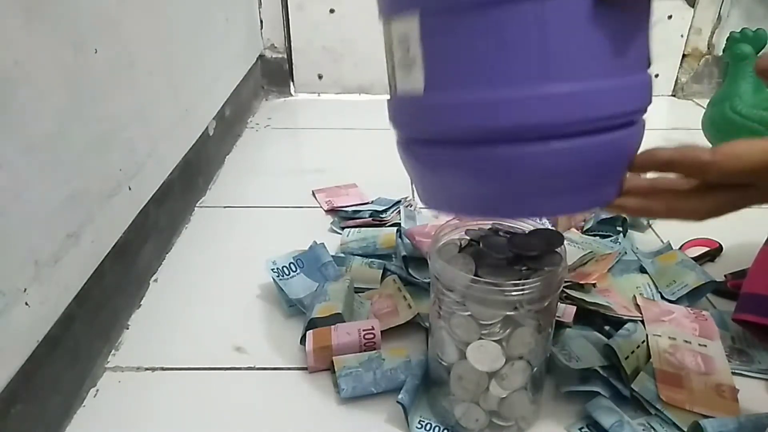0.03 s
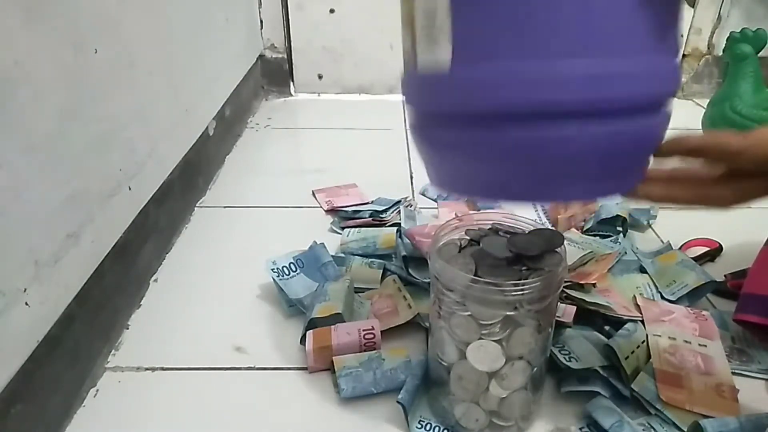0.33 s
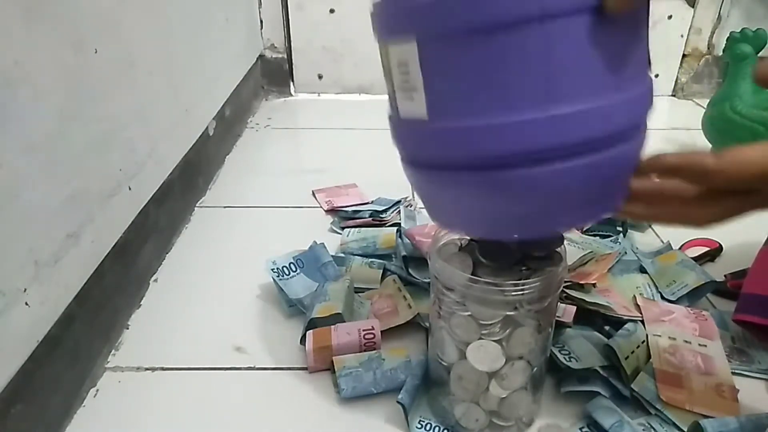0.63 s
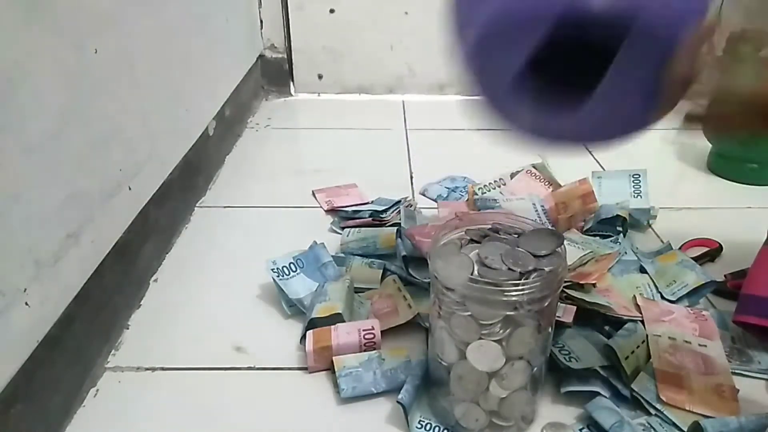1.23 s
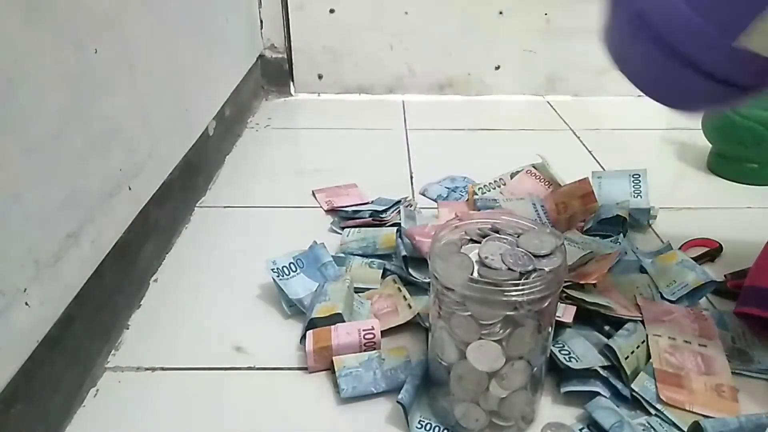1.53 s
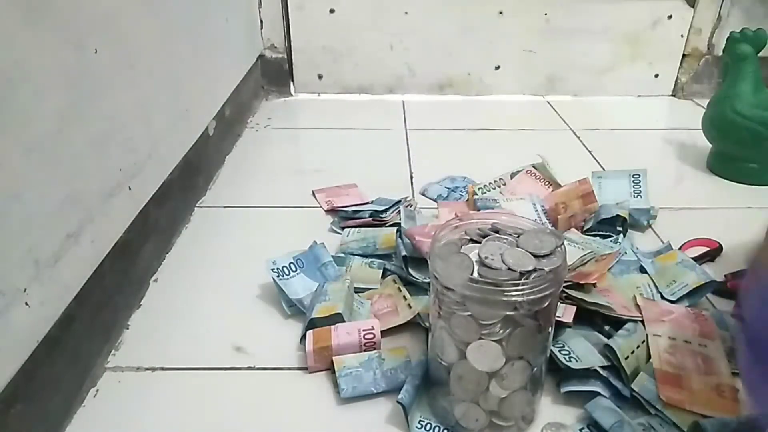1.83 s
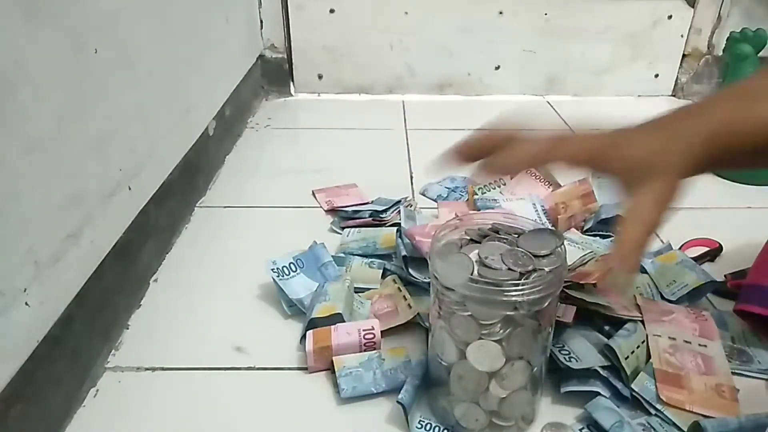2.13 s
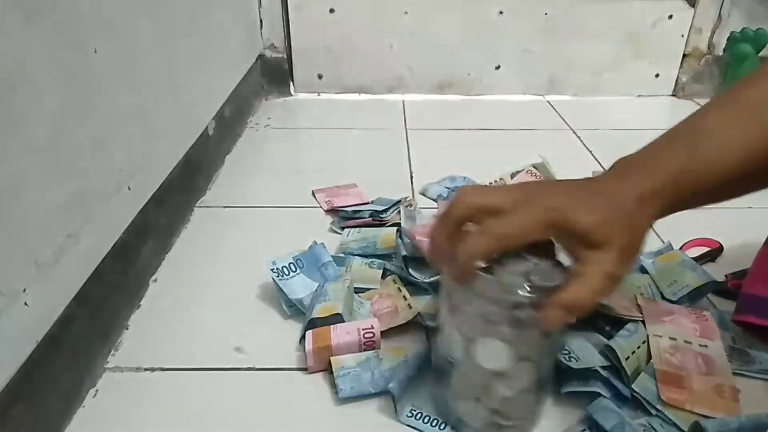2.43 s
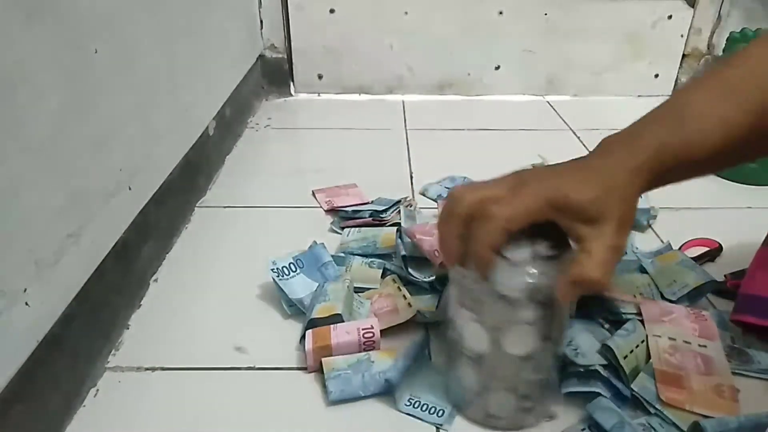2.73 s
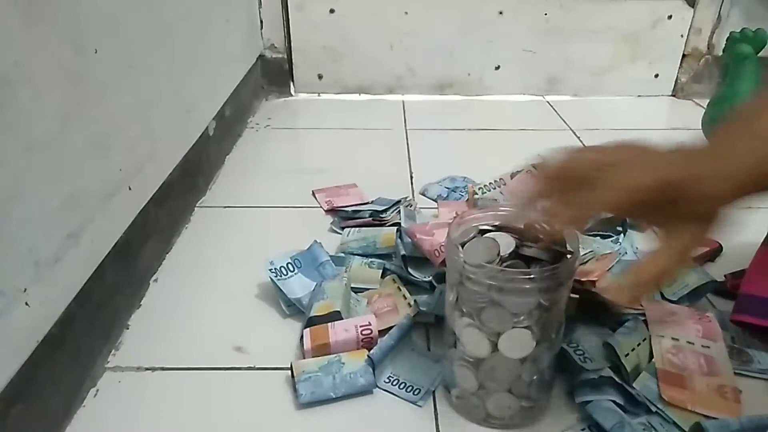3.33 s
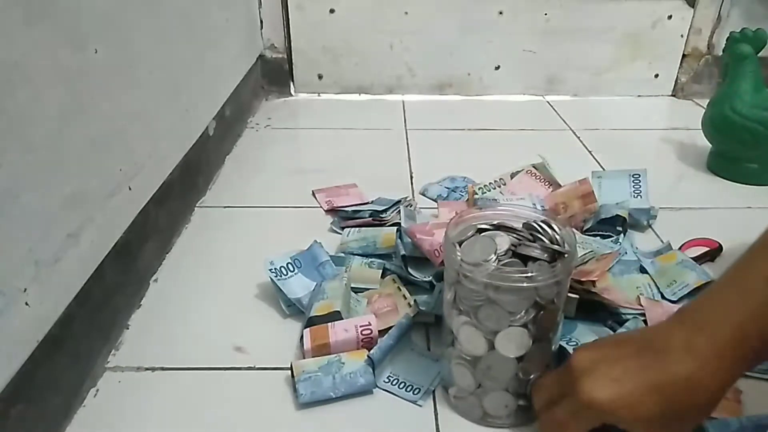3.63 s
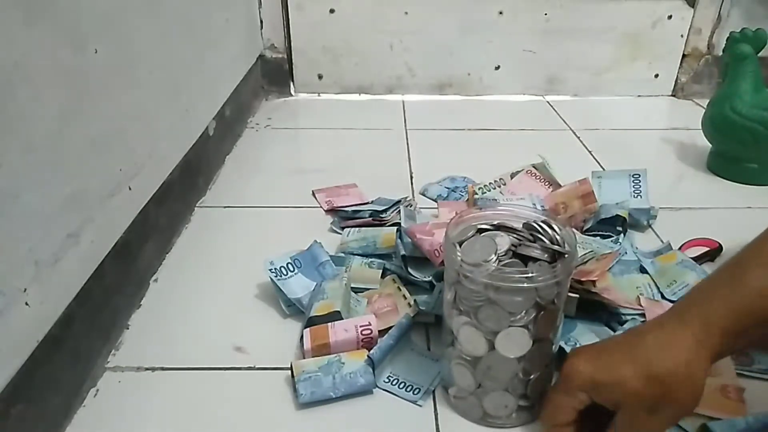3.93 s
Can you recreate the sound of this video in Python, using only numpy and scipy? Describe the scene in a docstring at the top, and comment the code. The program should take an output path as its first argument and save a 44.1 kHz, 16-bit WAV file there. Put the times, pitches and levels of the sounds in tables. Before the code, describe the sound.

Coins slide and knock inside a hollow plastic money bank and drop clinking onto a pile in a jar. The bank rolls aside, then the full jar is shaken and set down, close up in a small tiled room.

```python
"""Emptying a money bank into a coin jar.

In a small tiled room the last coins slide and knock in a hollow plastic bank, whose air hoots as it
swings. They drop clinking on the pile in a jar and ring very high as they spin. The bank rolls aside;
the full jar is shaken for a second and set down, a few coins settle and banknotes crinkle faintly.
The close microphone overloads a little."""
import sys
import numpy as np
from scipy import signal
from scipy.fft import rfft, irfft
from scipy.io import wavfile
from scipy.ndimage import uniform_filter1d

SR = 44100
rng = np.random.default_rng(int(sys.argv[2]) if len(sys.argv) > 2 else 0)


def int16_out(signal):
    """Quantize to a 16-bit WAV file."""
    q = np.round(np.clip(np.atleast_2d(signal).T, -1, 1) * 32767)
    wavfile.write(sys.argv[1], SR, q.astype(np.int16))


N = 176400
LARGE, MEDIUM, SMALL = 12915, 13100, 14640  # lower mode by coin size, f/Hz


def from_db(db):
    """Decibels to gain."""
    return 10 ** (np.asarray(db) / 20)


def rms_one(x):
    """Scale to unit power."""
    return x / np.sqrt(np.mean(x ** 2) + 1e-20)


def even(x, window_s):
    """Hold the running power at 1."""
    return x / np.sqrt(np.abs(uniform_filter1d(x ** 2, int(window_s * SR) + 1)) + 1e-9)


def level(curve):
    """Gain from a curve of (t/s, level/dB), silent outside it."""
    times_s, db = np.vstack(curve).T
    return from_db(np.interp(np.arange(N) / SR, times_s, db, left=-120, right=-120))


def colour(x, spectrum):
    """Minimum-phase filter from (f/Hz, level/dB); keeps the power of white noise."""
    hz, db = np.transpose(spectrum)
    bins_hz = np.arange(N + 1) * SR / (2 * N)
    gain = rms_one(from_db(np.interp(np.log(bins_hz + 1), np.log(hz), db)))
    cepstrum = irfft(np.log(gain))[:N]
    cepstrum[1:] *= 2
    return irfft(np.exp(rfft(cepstrum, 2 * N)) * rfft(x, 2 * N))[:N]


def ring(x, hz, t60_s):
    """One damped mode: a unit click starts a sine of height 1."""
    r, w = from_db(-60 / (t60_s * SR)), 2 * np.pi * hz / SR
    return signal.lfilter([0, np.sin(w)], [1, -2 * r * np.cos(w), r * r], x + 1e-18)


def ring_modes(x, modes):
    """Modes (f/Hz, level/dB, t60/s) driven by x, at unit total power."""
    return rms_one(sum(from_db(db) * rms_one(ring(x, hz, t60_s)) for hz, db, t60_s in modes))


def ping(at_s, hz, t60_s):
    """One mode, struck once."""
    return ring(signal.unit_impulse(N, int(at_s * SR)), hz, t60_s)


def resonance(hz, width_hz):
    """Noise-driven resonance of steady power; its centre may move."""
    r = np.exp(-np.pi * width_hz / SR)
    a, b = signal.lfilter([1 - r], [1, -2 * r, r * r], rng.standard_normal((2, N)))
    phase = 2 * np.pi * np.cumsum(hz * np.ones(N)) / SR
    return even(a * np.cos(phase) + b * np.sin(phase), window_s=0.036)


def burst(t60_s):
    """Dying noise of unit energy: a crowd of short modes."""
    t = np.arange(SR // 2) / SR
    x = rng.standard_normal(len(t)) * from_db(-60 * t / t60_s)
    return x / np.linalg.norm(x)


def contacts(per_s, spread_db, t60_s, timbres=8):
    """Random contacts of unequal size, each ringing briefly; steady power."""
    sizes = from_db(spread_db * np.minimum(rng.exponential(1, N), 4))
    hits = sizes * (rng.random(N) < per_s / SR)
    timbre = rng.integers(0, timbres, N)
    stream = sum(signal.fftconvolve(hits * (timbre == k), burst(t60_s))[:N] for k in range(timbres))
    return even(stream, window_s=0.0346)


def blows(rows, t60_s, bounce_s, bounce_db):
    """A short crack and a weaker bounce per row (t/s, level/dB)."""
    out = np.zeros(N + SR)
    for at_s, db, *_ in rows:
        for delay_s, loss_db in ((0, 0), (bounce_s * rng.uniform(.5, 1.5), bounce_db)):
            crack = burst(t60_s) * np.sqrt(.003 * SR)  # energy of 3 ms at unit power
            i = int((at_s + delay_s) * SR)
            out[i:i + len(crack)] += from_db(db + loss_db) * crack
    return out[:N]


def room(x, wet_db):
    """Add the diffuse tail of the tiled room, 5 ms late."""
    tail = np.r_[np.zeros(SR // 200), burst(t60_s=0.24)]
    return x + from_db(wet_db) * signal.fftconvolve(x, tail)[:N]


def room_hum():
    """Steady low noise of the room."""
    spectrum = [(25, 1), (45, -7), (75, -1), (130, -4), (200, -15), (350, -22), (1000, -20.5),
                (3000, -31.5), (8000, -37), (15000, -31)]  # f/Hz, level/dB
    return from_db(-45) * colour(rng.standard_normal(N), spectrum)


def thump(start_s=0.16, end_s=0.396, fade_s=0.012, swing_hz=2.7):
    """The overloaded microphone swings slowly once after the first hard hit: a faint low thump."""
    t = np.arange(N) / SR
    gate = np.clip((t - start_s) / fade_s, 0, 1) * np.clip((end_s - t) / fade_s, 0, 1)
    return from_db(-13) * gate * np.sin(2 * np.pi * swing_hz * (t - .228))


def banknotes():
    """Paper crinkles faintly under the hand and the jar."""
    brushing = [(3.57, -64), (3.62, -29), (3.66, -49), (3.69, -34.5), (3.76, -47), (3.80, -42),
                (3.85, -53.5), (3.92, -53), (3.98, -42), (4.0, -47)]  # t/s, level/dB
    paper_spectrum = [(300, -4), (1500, -0.5), (3300, 1.5), (5500, -6), (8200, 7), (11000, -6),
                      (15000, -0.5)]  # f/Hz, level/dB
    crinkle = contacts(per_s=500, spread_db=2, t60_s=0.02) * level(brushing)
    return room(colour(crinkle, paper_spectrum), wet_db=-10)


def rolling_bank():
    """The bank rolls on the tiles: a hollow scrape with gliding resonances."""
    rolling = [(2.021, -31), (2.045, -26.5), (2.12, -25.5), (2.32, -31.5), (2.371, -43)]  # t/s, level/dB
    # shell modes: start f/Hz, end f/Hz, width/Hz, start level/dB, end level/dB
    shell_modes = [(243, 160, 30, -8.5, -9), (430, 480, 110, 0, -9), (582, 700, 220, -10, -21),
                   (1180, 1380, 240, -4.5, 5), (1666, 1600, 300, -13.5, 1.5)]
    t = np.arange(N) / SR
    span_s = (rolling[0][0], rolling[-1][0])
    shell = np.zeros(N)
    for start_hz, end_hz, width_hz, start_db, end_db in shell_modes:
        gain = from_db(np.interp(t, span_s, (start_db, end_db)))
        shell += gain * resonance(np.interp(t, span_s, (start_hz, end_hz)), width_hz)
    return level(rolling) * shell


def bank_air():
    """The air in the bank hoots with each swing; the pitch shifts as the bank is turned."""
    # swells: peak t/s, length/s, f/Hz, level/dB
    hoots = [(.01, 0.11, 265, -36), (0.285, 0.071, 265, -36), (0.482, 0.13, 255, -40),
             (0.696, 0.061, 260.7, -21), (0.877, 0.084, 260.5, -33.5), (0.971, .06, 260.7, -30.5),
             (1.03, 0.14, 265, -37), (1.252, 0.19, 220.9, -30.5), (1.439, 0.11, 193, -27),
             (1.814, 0.21, 260, -20.5), (1.968, 0.065, 243, -24)]
    t = np.arange(N) / SR
    peaks_s, _, pitches_hz, _ = np.transpose(hoots)
    swell = sum(from_db(db) * np.cos(np.pi * np.clip((t - peak_s) / length_s, -.5, .5)) ** 2
                for peak_s, length_s, _, db in hoots)
    return swell * resonance(np.interp(t, peaks_s, pitches_hz), width_hz=44)


def coins_in_bank():
    """Coins slide and knock in the hollow plastic bank, and sing as it is turned over."""
    sliding = [
        [(0.0, -26), (.14, -49), (.225, -67), (.266, -31), (.37, -20), (.412, -47), (.49, -32.5), (.6, -59.5)],
        [(.66, -26.5), (.698, -19.5), (.78, -34), (.82, -52), (.87, -37.5), (.93, -42.5), (1.028, -21.5),
         (1.112, -44), (1.264, -18.5), (1.33, -34)],
        [(1.438, -14.5), (1.49, -24), (1.632, -44.5), (1.66, -23), (1.7, -11), (1.742, -23.5), (1.76, -12.5),
         (1.812, -19.5), (1.825, -30), (1.898, -14.5), (1.934, -31.5)],
        [(1.97, -22), (2.012, -32), (2.04, -22), (2.2, -23.5), (2.325, -19.5), (2.375, -36), (2.42, -48)],
    ]  # runs of (t/s, level/dB)
    # hits on the wall: t/s, level/dB, wall ring f/Hz, ring level/dB, ring t60/s
    wall_hits = [(0.167, -13.5, 1313, -16, 0.048), (.565, -26, 1488, -16, 0.027),
                 (1.021, -25, 1914, -17.5, 0.056), (1.36, -15, 1330, -30, .06),
                 (1.399, -15, 623, -10, 0.037), (1.428, -7, 632, -7.5, 0.082),
                 (1.502, -8.5, 571, -15.5, 0.21), (1.643, -7.5, 885, -16, 0.031),
                 (1.675, -19, 548, -17, 0.073), (1.751, -6, 554, -28, 0.093),
                 (1.787, -12, 415.5, -8.5, 0.13), (1.803, -4.5, 250, 0, 0.084),
                 (1.944, -6, 1266, -2, 0.034), (1.969, -16.5, 561, -4, 0.035),
                 (1.996, -35, 3390, -15.5, 0.043), (2.165, -19.5, 1270, -19, .06),
                 (2.18, -13, 1097, -14.5, 0.073), (2.265, -16.5, 1294, -20, 0.15),
                 (3.84, -57, 635, -36, 0.055)]
    bank_spectrum = [(70, -35.5), (130, -1.5), (200, -2.5), (310, -6.5), (400, -1.5), (620, 2), (800, -7.5),
                     (1300, -1.5), (2200, -5), (3300, -14.5), (5000, -24.5), (15000, -28.5)]  # f/Hz, level/dB
    # modes of the bank and of the loose coins: f/Hz, level/dB, t60/s
    bank_modes = [(198, -24, 0.21), (254, -2.5, 0.24), (406, -5, 0.1), (546, -9.5, 0.17), (935, -8, 0.09),
                  (1111, 4.5, 0.13), (1280, -7, 0.29), (1414, 4, 0.05), (1970, -3.5, 0.14)]
    coin_modes = [(10600, 3.5, 0.056), (10910, 7.5, 0.094), (13000, -6.5, 0.052), (13520, 16, 0.1),
                  (14000, -10, 0.049)]
    # coins singing during the turn: t/s, level/dB
    turning = [(1.2, -20), (1.38, -13), (1.5, -1.5), (1.8, -7.5), (2.12, 7), (2.3, -3), (2.42, -48)]
    slide = contacts(per_s=900, spread_db=1.5, t60_s=0.016) * level(sliding)
    knocks = blows(wall_hits, t60_s=0.04, bounce_s=.007, bounce_db=-3)
    knocks = signal.sosfilt(signal.butter(2, 300, "high", fs=SR, output="sos"), knocks)
    drive = from_db(-2.5) * slide + from_db(-1.5) * knocks
    hollow = from_db(-10) * drive.std() * ring_modes(drive, bank_modes)
    wall = sum(from_db(db) * ping(at_s, hz, t60_s) for at_s, _, hz, db, t60_s in wall_hits)
    tumble = slide * level(turning)
    singing = from_db(-2.5) * tumble.std() * ring_modes(tumble, coin_modes)
    return room(colour(drive, bank_spectrum) + hollow + wall, wet_db=-15.5) + singing


def shaken_jar():
    """Coins clash with each other and the thin jar wall, which knocks hollowly at the turns."""
    shaking = [(2.38, -28), (2.41, -15), (2.456, -27), (2.48, -16), (2.58, -16.5), (2.615, -25.5),
               (2.64, -20.5), (2.74, -21.5), (2.774, -18.5), (2.815, -32), (2.86, -22.5), (2.9, -23),
               (2.93, -17), (3.01, -23), (3.065, -18.5), (3.16, -32.5), (3.215, -20), (3.35, -28),
               (3.42, -96)]  # t/s, level/dB
    # the load of coins hits the jar: t/s, level/dB
    load_hits = [(2.393, -22), (2.403, -10), (2.417, -14.5), (2.479, -9), (2.505, -8), (2.558, -9.5),
                 (2.577, -14.5), (2.626, -13.5), (2.654, -12.5), (2.689, -18.5), (2.775, -17),
                 (2.847, -23.5), (2.925, -12.5), (2.965, -14), (3.022, -24), (3.046, -14), (3.10, -17.5),
                 (3.207, -18), (3.219, -16), (3.285, -18), (3.309, -25), (3.34, -49), (3.576, -33),
                 (3.622, -22.5)]
    wall_knocks = [(2.415, 657, -17.5), (2.478, 1056, -15.5), (2.575, 680, -22), (2.857, 720, -24)]  # t/s, f/Hz, level/dB
    coin_spectrum = [(1000, -37), (5000, -14), (6800, -8.5), (8300, 1.5), (9200, -3), (10500, -14),
                     (12300, -14), (13000, 3), (13600, 6.5), (14000, -3), (15400, 0)]  # f/Hz, level/dB
    wall_spectrum = [(100, -26), (350, -13.5), (600, -9), (1000, -1.5), (1350, -4), (1900, -1.5),
                     (2400, -0.5), (2900, -3), (3600, -3), (5000, -6), (9000, -8.5)]  # f/Hz, level/dB
    clash = contacts(per_s=650, spread_db=1, t60_s=0.015) * level(shaking)
    jolts = from_db(5) * blows(load_hits, t60_s=0.024, bounce_s=0.0066, bounce_db=-1)
    coins = colour(from_db(4.5) * clash + jolts, coin_spectrum)
    wall = colour(from_db(-6.5) * clash + from_db(-8.5) * jolts, wall_spectrum)
    hollow = sum(from_db(db) * ping(at_s, hz, t60_s=0.041) for at_s, hz, db in wall_knocks)
    return room(coins + wall + hollow, wet_db=-7.5)


def ringing_coins(mode_ratio=1.0325, attack_s=.0008, damped_t60_s=0.13, chatter_hz=70):
    """A free coin rings on a split pair of modes, wavering as it spins, until damped."""
    # rings: t/s, lower mode f/Hz, lower level/dB, upper level/dB, free time/s
    free_rings = [(0, LARGE, -20, -6.5, .003), (.168, LARGE, -12.5, -15, 0.19),
                  (.382, LARGE, -27, -10, 0.12), (.525, LARGE, -25, -4, 0.037),
                  (.58, LARGE, -16, -11, 0.048), (.764, SMALL, -3, -11, 0.0086), (.786, SMALL, -2, -2, .02),
                  (.892, LARGE, -12, -6, 0.019), (.926, LARGE, -25, -9, 0.042),
                  (1.362, LARGE, -22, -16.5, 0.065), (1.69, MEDIUM, -14, -13.5, 0.034),
                  (1.845, MEDIUM, -12, -12, 0.053), (1.994, LARGE, -35, -5.5, 0.0033),
                  (2.11, MEDIUM, -18, -15, .01), (2.195, MEDIUM, -12, -14, .012),
                  (2.782, SMALL, -19, -1, .002), (2.797, SMALL, -13, -2, 0.022),
                  (2.876, SMALL, -22, -3.5, 0.039), (2.97, SMALL, -10, -6.5, 0.019),
                  (3.022, SMALL, -11, -16, 0.06), (3.098, SMALL, -8, -3.5, 0.035),
                  (3.263, SMALL, -7, -5, 0.018), (3.31, SMALL, -5.5, -6, .03)]
    out = np.zeros(N)
    for at_s, lower_hz, lower_db, upper_db, free_s in free_rings:
        i = int(at_s * SR)
        t = np.arange(min(N - i, SR // 2)) / SR
        damping = from_db(-60 * np.maximum(t - free_s, 0) / damped_t60_s)
        envelope = (1 - np.exp(-t / attack_s)) * damping
        for hz, db in ((lower_hz, lower_db), (lower_hz * mode_ratio, upper_db)):
            spin_hz = 25.6 * rng.uniform(0.47, 1.42)
            waver = 1 + 0.33 * np.cos(2 * np.pi * spin_hz * t)
            out[i:i + len(t)] += from_db(db) * envelope * waver * np.sin(2 * np.pi * hz * t)
    lowpass = signal.butter(2, chatter_hz, fs=SR, output="sos")
    chatter_db = 2 * rms_one(signal.sosfilt(lowpass, rng.standard_normal(N)))
    return out * from_db(chatter_db - 3)


def falling_coins():
    """Coins jostle at the bank's opening and strike the pile."""
    jostling = [
        [(0.0, -18), (0.155, -80), (0.175, -31.5), (0.596, -29.5), (0.75, -17.5)],
        [(0.75, -31), (1.03, -28), (1.158, -53), (1.27, -21.5), (1.62, -40.5)],
        [(1.635, -41), (1.65, -22.5), (1.81, -22.5), (1.824, -32.5), (2.28, -23), (2.38, -31.5)],
    ]  # runs of (t/s, level/dB)
    pile_hits = [(.167, -11.5), (.173, -7.5), (.382, -4), (.524, -12), (.541, -11.5), (.551, -10),
                 (.564, -3.5), (.568, -5), (.585, -22), (.759, -15), (.775, -9), (.876, -15), (.893, -21),
                 (.926, -14.5), (.966, -15.5), (1.021, -13.5), (1.218, -19), (1.261, -8), (1.266, -14),
                 (1.337, -11), (1.362, 2), (1.643, -15), (1.69, -8), (1.802, -5.5), (1.97, -15.5),
                 (2.178, -14), (3.647, -22), (3.677, -17), (3.694, -37)]  # t/s, level/dB
    coin_spectrum = [(300, -17), (1500, -15.5), (3500, -14.5), (5500, -17), (7000, -9.5), (8300, 2.5),
                     (9700, -7), (12200, -9), (13300, 9), (14200, -4.5), (15400, 2)]  # f/Hz, level/dB
    jostle = from_db(2.5) * contacts(per_s=280, spread_db=5, t60_s=0.066) * level(jostling)
    clinks = from_db(2) * blows(pile_hits, t60_s=0.014, bounce_s=0.0037, bounce_db=-4.5)
    return room(colour(jostle + clinks, coin_spectrum), wet_db=-7.5)


def scene():
    """All sources over the room's hum, mono."""
    background = room_hum() + thump()
    bank = coins_in_bank() + bank_air() + rolling_bank()
    coins = falling_coins() + ringing_coins() + shaken_jar()
    return (background + bank + coins + banknotes())[None]


def record(dry):
    """Mild overload flattens the loudest peaks; a steep low-pass cuts the top."""
    ceiling, cutoff_hz = .8, 15550
    oversampled = signal.resample_poly(dry, 4, 1, axis=-1)
    clipped = oversampled / (1 + (oversampled / ceiling) ** 6) ** (1 / 6)
    lowpass = signal.ellip(12, .2, 80, cutoff_hz, fs=SR, output="sos")
    return signal.sosfilt(lowpass, signal.resample_poly(clipped, 1, 4, axis=-1))


dry = scene()
out = record(dry)
int16_out(out)
```